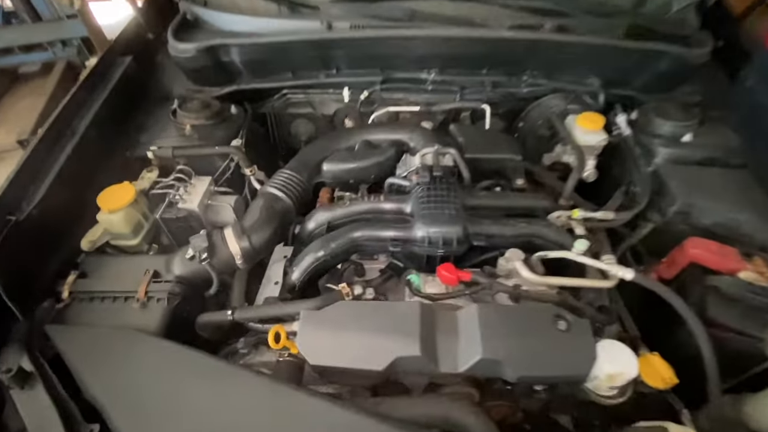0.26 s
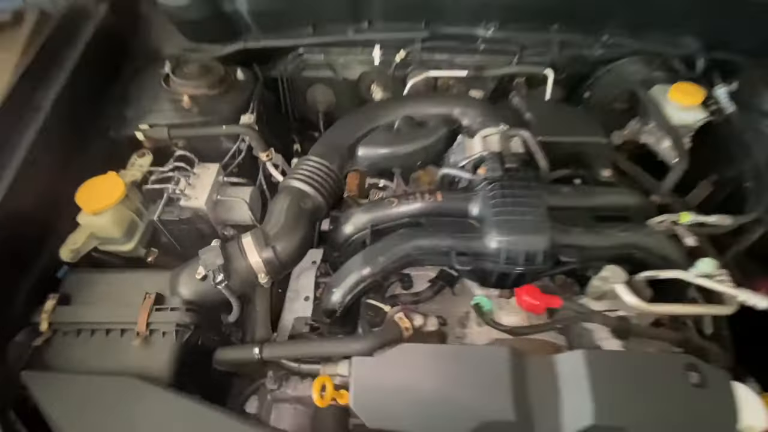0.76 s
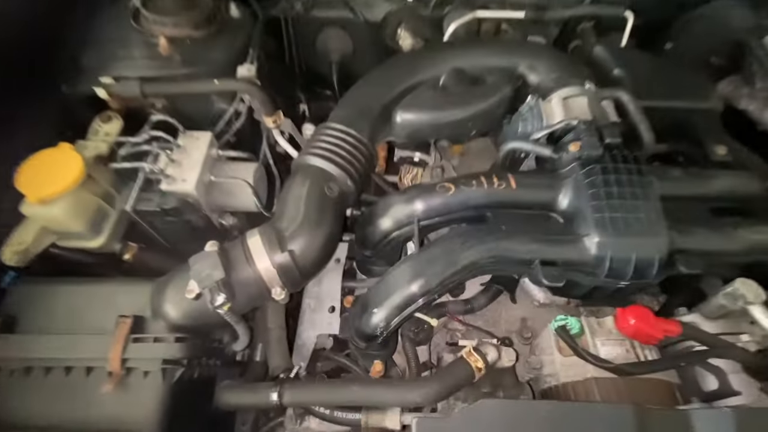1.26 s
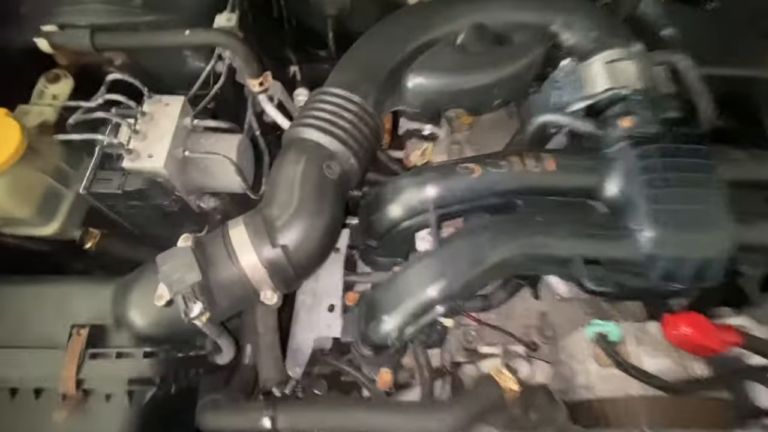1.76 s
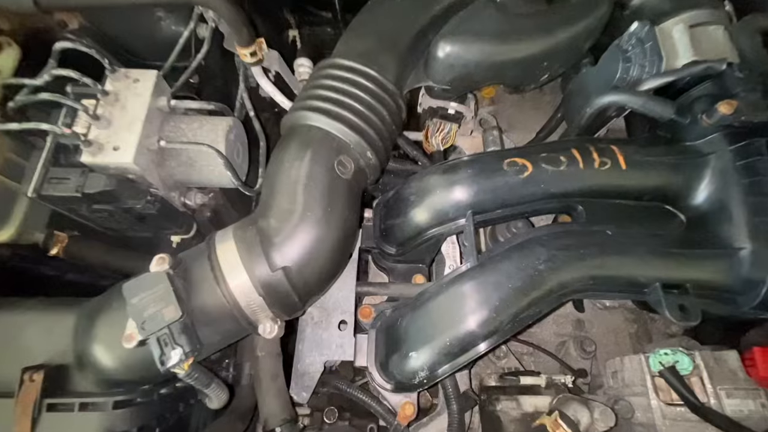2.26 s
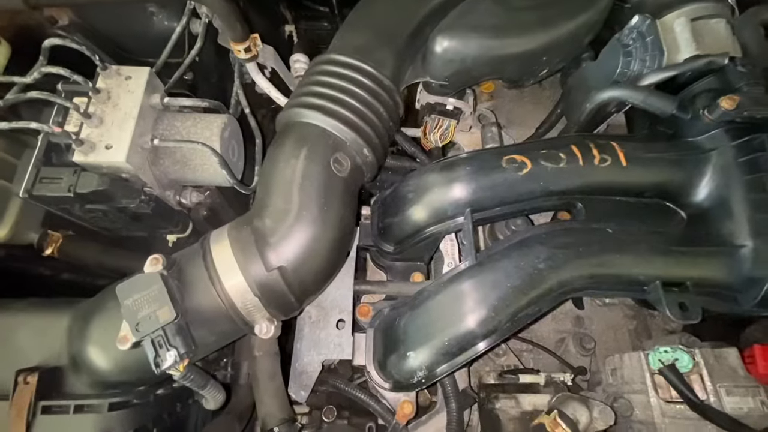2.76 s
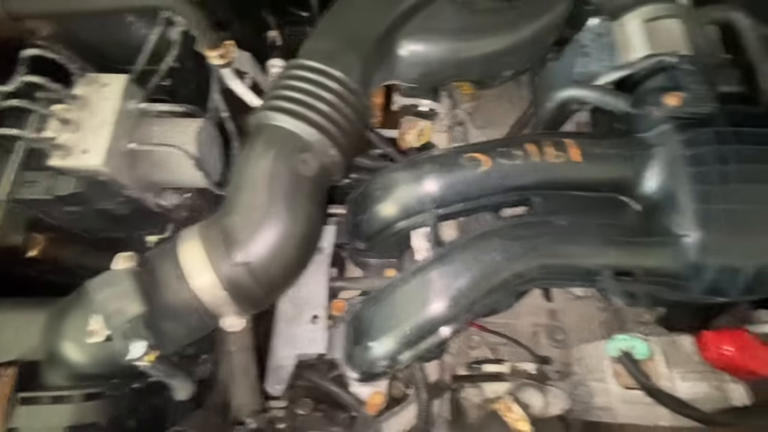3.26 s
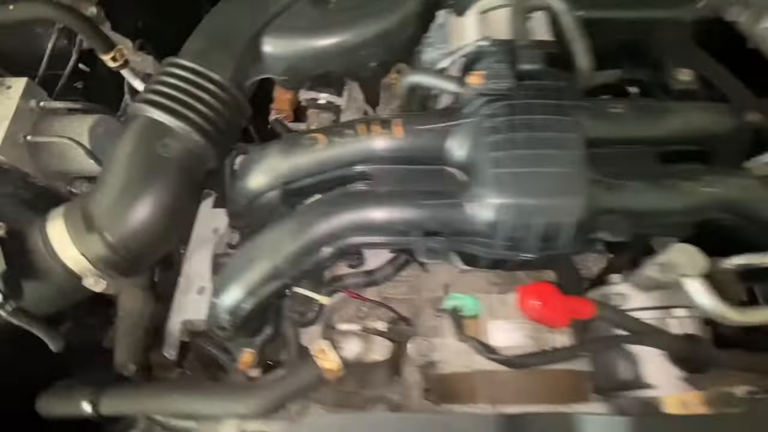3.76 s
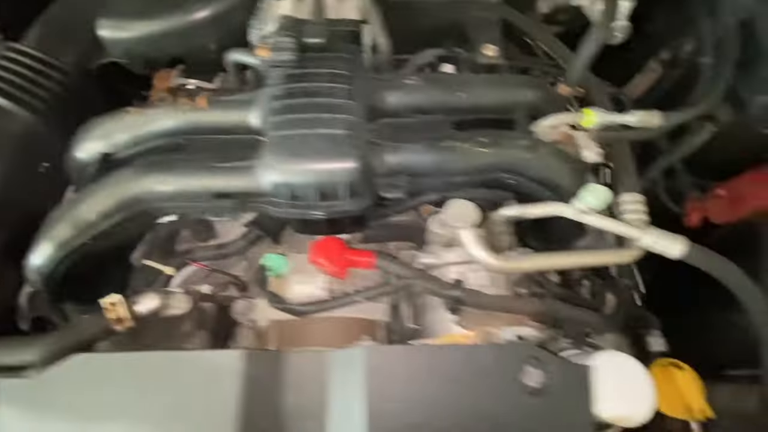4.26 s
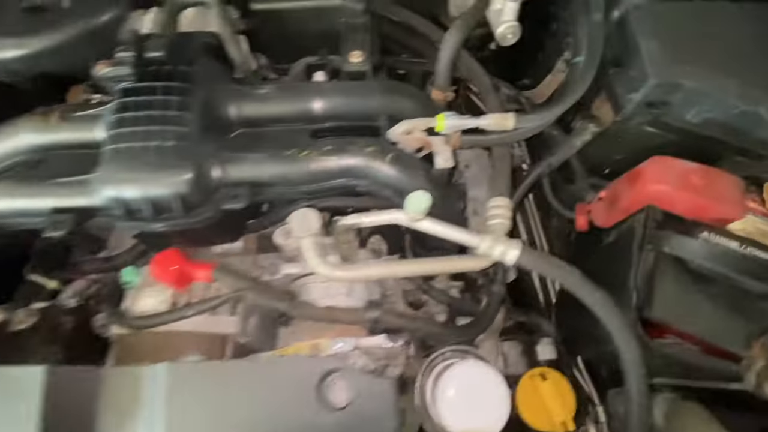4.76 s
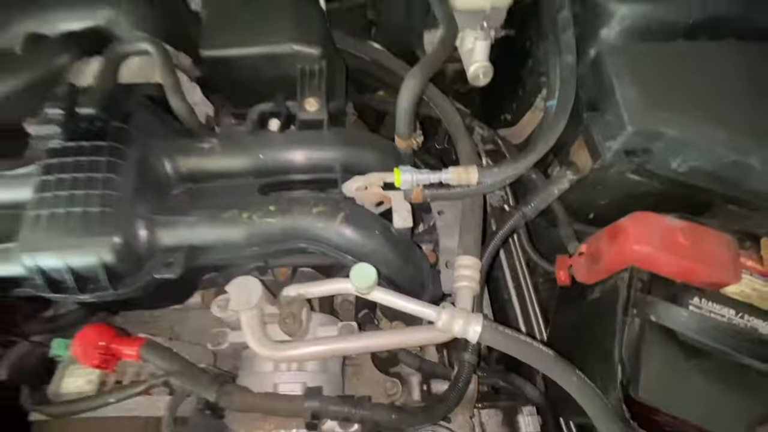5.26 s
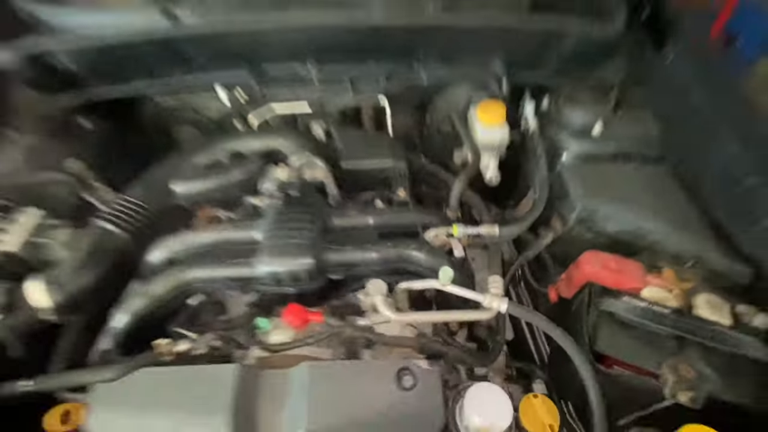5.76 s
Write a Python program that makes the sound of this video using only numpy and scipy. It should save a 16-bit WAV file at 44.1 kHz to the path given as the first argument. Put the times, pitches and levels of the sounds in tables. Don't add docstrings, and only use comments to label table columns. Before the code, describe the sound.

Rapid, even steel hammering from a worn four-cylinder engine, over a low exhaust hum and belt hiss, heard close under an open bonnet.

```python
import sys
import numpy as np
from scipy import signal
from scipy.fft import rfft, irfft, next_fast_len
from scipy.io import wavfile
from scipy.ndimage import uniform_filter1d

SR = 44100
rng = np.random.default_rng(int(sys.argv[2]) if len(sys.argv) > 2 else 0)


def volts(x):
    e = np.asarray(x, float) / 20
    return 10 ** e


def generate_wav(sig):
    pcm = np.round(np.clip(np.atleast_2d(sig).T, -1, 1) * 32767).astype(np.int16)
    wavfile.write(sys.argv[1], SR, pcm)


N = 264688

MIDDLE_DB = -10

# [left minus right, dB]
CAMERA = [(0, -13.5, 1), (.45, -11.5, 0), (.85, -11, 0.5), (1.35, -7.5, 0), (1.75, -7, -2), (2.2, -7, -0.5),
          (2.7, -8, -0.5), (3.4, -9.5, -0.5), (3.75, -10, 2), (4.15, -11.5, 3), (4.65, -11.5, 0.5),
          (5.1, -10.5, 5), (5.5, -12, 1), (6, -17, 6)]


def knocking():
    t = np.arange(-SR // 8, N) / SR
    knock_s = t[1:][np.diff(np.floor(turns(t))) > 0]
    chance = rng.spawn(1)[0].standard_normal((len(knock_s), 3)).T
    near_db = column(CAMERA, index=1, times=knock_s) - MIDDLE_DB
    side_db = column(CAMERA, index=2, times=knock_s)
    scatter_db = 0.64 * chance[:2]
    pan_db = side_db + 1.05 * chance[2]
    return (crack(knock_s, near_db + scatter_db[0], pan_db)
            + ring(knock_s, near_db, scatter_db[1], pan_db)
            + thud(knock_s, near_db, side_db))


# pitch_hz [Hz], width_hz [Hz], left_leads [rad], left_minus_right_db [dB],
# then level_db [dB] heard from each camera spot
STEEL = [(3376, 60, 4.1, 21, -11, -6, -1.5, 0.5, -13, -15),
         (4675, 550, 0.78, 8, -3, -8.5, -5, -4, -6.5, -2.5),
         (5555, 328, 0.21, 11.5, -27, -14, -10, -2, -7, -4.5),
         (6424, 160, 1.6, -26, -14.5, -11, -37, -20, -11, -12),
         (10020, 1040, 7.2, -37, -31, -42, -27, -48, -36, -29.5)]
# pitch_hz [Hz], level_db [dB per Hz]
CRACK = [(1200, -51), (2500, -2.5), (4000, -7.5), (5500, -2.5), (7800, -13.5), (10000, -8.5),
         (12200, -22.5), (14500, -15), (16400, -34)]


def crack(knock_s, level_db, pan_db):
    return blows(knock_s, level_db - 27.5, 0.98 * pan_db, 1, STEEL, CRACK,
                 lag=-0.0006304, rise=0.0011696, t60=0.047, tail_db=-23.5, tail_t60=0.21,
                 drift=2.43, fresh=0.17, between_db=0.5, struck_db=-2.5, widen=0.72,
                 snap_db=-6.0, uneven_db=1.5)


# pitch_hz [Hz], width_hz [Hz], left_leads [rad], left_minus_right_db [dB],
# then level_db [dB] heard from each camera spot
BLOCK = [(832, 97, 1.53, -2.5, -8, -9.5, -6, -6, -8.5, -7.5),
         (944, 29, 0.33, 13.5, -7.5, -9, -37, -29, -10.5, -6.5),
         (1011, 50.4, 0.49, 4, 1, 1, 7.5, 9, -7.5, -4.5), (1323, 81, 2.16, -7, -1, -6.5, 5, 1, -5, -7.5),
         (1490, 85, 2.3, 2, -11, -3, 0, 4, -0.5, -1.5), (1607, 75, 1.3, -3.5, -6.5, -8, 5, 0, -20.5, -9),
         (1984, 125, 1.53, -7, -8.5, -5, -8, -11, -11.5, -10.5),
         (2170, 77, 1.4, -11, -8.5, -22, -5.5, -6.5, -31, -31),
         (2406, 156, 0.67, -3, -23, -49, -23, -41, -9.5, -15)]
# pitch_hz [Hz], level_db [dB per Hz]
RING = [(450, -59), (640, -3), (800, -2), (950, -5), (1500, 0.5), (2500, -2), (3500, -5), (5000, -13.5),
        (8000, -59)]


def ring(knock_s, near_db, scatter_db, pan_db):
    level_db = -23.5 + 0.58 * near_db + scatter_db
    return blows(knock_s, level_db, 0.38 * pan_db, 2, BLOCK, RING,
                 lag=0.0001, rise=0.001472, t60=0.027, tail_db=-6.5, tail_t60=0.25,
                 drift=1.2, fresh=0.06, between_db=-11, struck_db=12, widen=2.4,
                 snap_db=-30, uneven_db=1.3)


# pitch_hz [Hz], width_hz [Hz], left_leads [rad], left_minus_right_db [dB],
# then level_db [dB] heard from each camera spot
PANELS = [(261, 167, 0.22, -0.5, -8, -3, -10, -12.5, -5, 15),
          (398, 74, 0.21, -6, -4, -6, -9, -9.5, -10, -17), (534.6, 26, 1.9, 2.5, 5, -9, -8, -6.5, 1, -4)]
# pitch_hz [Hz], level_db [dB per Hz]
THUD = [(40, -45), (75, -37), (140, -27), (210, -22.5), (400, -6.5), (560, -7.5), (640, -11), (1000, -38)]


def thud(knock_s, near_db, side_db):
    level_db = -41 + 0.93 * near_db - 0.3 * side_db
    return blows(knock_s, level_db, 0 * knock_s, 3, PANELS, THUD,
                 lag=0.0001, rise=0.003706, t60=0.13, tail_db=-23, tail_t60=0.18,
                 drift=0.43, fresh=0.04, between_db=-1, struck_db=0.5, widen=5.0,
                 snap_db=-30, uneven_db=2.5)


# delay_s [s after the knock], crack_db [dB], ring_db [dB], thud_db [dB]
FIRINGS = [
    (0, 6.5, -9.5, -2.5),
    (.0035, -0.5, -3, 2),
    (.0075, -30, -11.5, -11.5),
    (0.0215, -12, -10.5, 0),
    (.040, -45, -25, 0.5),
    (0.0577, -10, -13, -25),
    (0.0635, -17, -19.5, -14),
]


def blows(knock_s, level_db, pan_db, force_column, modes, spectrum, lag, rise, t60, tail_db, tail_t60,
          drift, fresh, between_db, struck_db, widen, snap_db, uneven_db):
    size, early = 8192, 0.02
    count = len(knock_s)
    t, hz = np.arange(size) / SR - early, np.fft.rfftfreq(size, 1 / SR)
    power, strikes = np.zeros((count, 1, size)), []
    for row in FIRINGS:
        since = np.maximum(t - row[0] - lag, 0)
        dying = volts(-60 * since / t60)
        dying += volts(tail_db - 60 * since / tail_t60)
        dying += volts(snap_db - 60 * since / 0.024)
        swell = 1 - np.exp(-(since / rise) ** 2)
        force = volts(row[force_column] + rng.normal(0, uneven_db, (count, 1)))
        power += (force[..., None] * swell * dying) ** 2
        grip = np.exp(2j * np.pi * rng.random((len(modes), 1)))
        delay = np.exp(-2j * np.pi * hz * (early + row[0] + lag + rise))
        strikes.append((force, grip * delay))
    shape = np.sqrt(power) * np.clip((0.15 - t) / 0.05, 0, 1)

    gains = heard(modes, knock_s).T * volts(rng.normal(0, 0.38 * uneven_db, (count, len(modes))))
    rattle = volts(between_db) + gains @ resonances(modes, hz)
    scattered = rfft(paths(knock_s, size, drift, fresh) * shape)
    z = ports(scattered, hz) * (rattle * volts(along(spectrum, hz)))[:, None]

    lead, lean_db = np.transpose(modes)[2:4, :, None]
    port = volts(lean_db / 2) * np.exp(0.5j * lead)
    rings = resonances(modes, hz) * resonances(modes, hz, widen)
    rings *= (1j * hz / (1j * hz + modes[0][0])) ** 2
    direct = volts(struck_db) * np.linalg.norm(shape) / np.sqrt(count) * gains
    for force, strike in strikes:
        z += np.stack([force * direct @ (strike * rings * side) for side in (port, 1 / port)], axis=1)

    cycles = irfft(z, size)
    energy = np.sum(cycles ** 2, axis=(1, 2), keepdims=True)
    cycles /= np.sqrt(energy / (2 * 0.075 * SR))
    out = np.zeros((2, N + SR + size))
    for start_s, level, pan, cycle in zip(knock_s, level_db, pan_db, cycles):
        first = round((start_s + 1 - early) * SR)
        out[:, first:first + size] += volts(level + np.array([[pan], [-pan]]) / 2) * cycle
    return out[:, SR:SR + N]


def paths(times, size, drift, fresh):
    knots = rng.standard_normal((40, 2, size))
    place = np.clip((times + 1) * drift, 0, len(knots) - 2)
    k = place.astype(int)
    turn = (place % 1 * np.pi / 2)[:, None, None]
    kept = np.cos(turn) * knots[k] + np.sin(turn) * knots[k + 1]
    fresh = np.clip(fresh, 0, 1)
    return np.sqrt(1 - fresh) * kept + np.sqrt(fresh) * rng.standard_normal(kept.shape)


def resonances(modes, hz, widen=1):
    centre, width = np.transpose(modes)[:2, :, None]
    damping = 1j * hz * width * widen
    return damping / (centre * centre - hz * hz + damping)


# multiple [of the cycle rate], left_minus_right_db [dB],
# then level_db [dB rms] at each camera spot
ORDERS = [(4, -1.5, -51.5, -47, -48.5, -46.5, -53, -53.5), (6, 1, -67, -63, -58, -65, -70, -75),
          (8, -1, -50.5, -48, -49, -49.5, -51, -52), (10, -1, -60, -57, -58, -58, -64, -63),
          (28, -3, -51, -51.5, -51, -53, -48, -51.5), (32, 17, -64, -47, -55, -75, -97, -79),
          (11, 3, -64, -55.5, -55, -55.5, -56, -80), (21, -7.5, -56, -65, -76, -72, -47.5, -46),
          (26, -13, -50, -46.5, -52, -57, -58, -61), (30, -3.5, -46, -42, -43, -44, -45.5, -43),
          (33, -3, -54, -54, -75, -72, -59, -44.5), (36, -10, -49, -46, -47, -45, -54.5, -63),
          (40, 12, -52.5, -42.5, -56, -46.5, -49, -78), (56, -9, -46, -49, -46, -44, -54, -63)]


def exhaust():
    t = np.arange(N) / SR
    angle = 2 * np.pi * (turns(t) - 0.135)
    out = np.zeros((2, N))
    for (k, lean_db, *_), gain in zip(ORDERS, heard(ORDERS, t)):
        k = round(k)
        start = (k % 4 > 0) * 2 * np.pi * rng.random()
        start = start + rng.normal(0, k / 60, (2, 1))
        swell = 1 + (k > 12) * 0.54 * np.cos(angle)
        side = volts([[lean_db / 2], [-lean_db / 2]])
        out += np.sqrt(2) * gain * swell * side * np.cos(k * angle + start)
    return out


# pitch_hz [Hz], level_db [dB per Hz]
WHIRR = [(60, -19), (110, -7), (200, -8.5), (300, -16), (620, -8.5), (850, 6), (2320, 3), (3250, -2.5),
         (5900, -8), (8000, -15), (11000, -17), (12200, -27), (14100, -21), (16300, -40)]


def whirr():
    z = signal.stft(rng.standard_normal((2, N + 4096)), nperseg=256)[2]
    patches = uniform_filter1d(rng.standard_normal(z.shape[1:]), 5, 0)
    patches = uniform_filter1d(patches, 6, 1)
    pair = signal.istft(z * volts(3.15 * unit(patches)), nperseg=256)[1]
    m = next_fast_len(pair.shape[1])
    hz = np.fft.rfftfreq(m, 1 / SR)
    hiss = irfft(ports(rfft(pair, m), hz) * volts(along(WHIRR, hz)), m)[:, :N]
    near_db = column(CAMERA, index=1, times=np.arange(N) / SR) - MIDDLE_DB
    return unit(hiss) * volts(-30 + 0.3 * near_db)


# pitch_hz [Hz], likeness [0-1]
ALIKE = [(60, .97), (180, 0.33), (550, 0.11), (1650, 0.042), (5000, 0.029), (9000, 0.28), (15000, .05)]
# pitch_hz [Hz], left_minus_right_db [dB]
LEAN = [(60, 8), (130, -12), (290, 5.5), (640, -1.5), (1410, -4), (3100, -2), (6820, 2), (15000, -3)]


def ports(z, hz):
    turn = np.arccos(np.clip(along(ALIKE, hz), -1, 1)) / 2
    mid = z[..., 0, :] * np.cos(turn)
    side = z[..., 1, :] * np.sin(turn)
    lean = volts(along(LEAN, hz) / 2)
    return np.stack([(mid + side) * lean, (mid - side) / lean], axis=-2)


SPOTS = [
    .3,
    1.001,
    1.799,
    2.799,
    4.2,
    5.3,
]


def heard(rows, times):
    return volts([np.interp(times, SPOTS, row[-len(SPOTS):]) for row in rows])


# time_s [s], speed_hz [engine cycles per s]
SPEED = [(0.0, 13.419), (0.6, 13.246), (1.2, 13.282), (1.8, 13.247), (2.4, 13.452), (3.0, 13.332),
         (3.6, 13.435), (4.2, 13.355), (4.8, 13.428), (5.4, 13.289), (6.0, 13.48)]


def turns(times):
    t = np.arange(-SR // 4, N + SR // 4) / SR
    done = np.cumsum(column(SPEED, index=1, times=t)) / SR
    first_turn = -0.145
    return np.interp(times, t, done - done[SR // 4] + first_turn)


def column(rows, index, times):
    return np.interp(times, *np.transpose(rows)[[0, index]])


def along(points, hz):
    f, v = np.transpose(points)
    return np.interp(np.log(hz + 1), np.log(f + 1), v)


def unit(x):
    return x / np.sqrt(np.mean(x ** 2) + 1e-20)


def scene():
    return knocking() + exhaust() + whirr()


def top_cut(x):
    return signal.sosfilt(signal.butter(12, 16480, fs=SR, output="sos"), x)


# low_hz [Hz], high_hz [Hz], share [of the time, 0-1]
DROPPED = [(7700, 8150, .14), (11500, 11900, .42), (11900, 12900, .68), (12900, 13300, .3),
           (13300, 14900, .04), (14900, 15500, .5), (15500, 16500, .78)]


def record(dry):
    hz, _, z = signal.stft(dry, SR, nperseg=512)
    z[:, hz > 16450] = 0
    for low_hz, high_hz, share in DROPPED:
        band = (hz >= low_hz) & (hz < high_hz)
        level = uniform_filter1d(np.sum(abs(z[:, band]) ** 2, axis=(0, 1)), size=3)
        level /= uniform_filter1d(level, size=80) ** 0.8
        z[:, band] *= level > np.quantile(level, share)
    mix = signal.istft(z, SR, nperseg=512)[1][:, :N]
    return top_cut(mix)


dry = scene()
out = record(dry)
generate_wav(out)
```